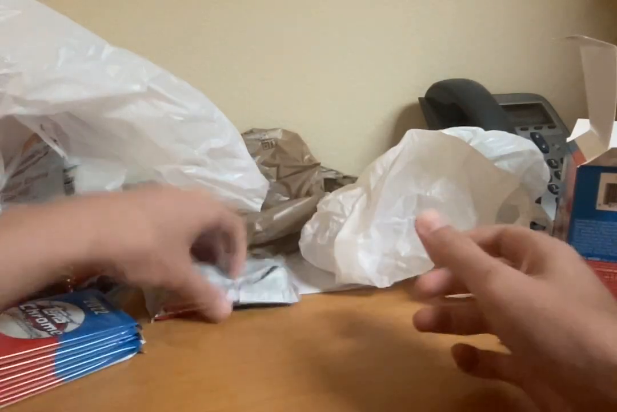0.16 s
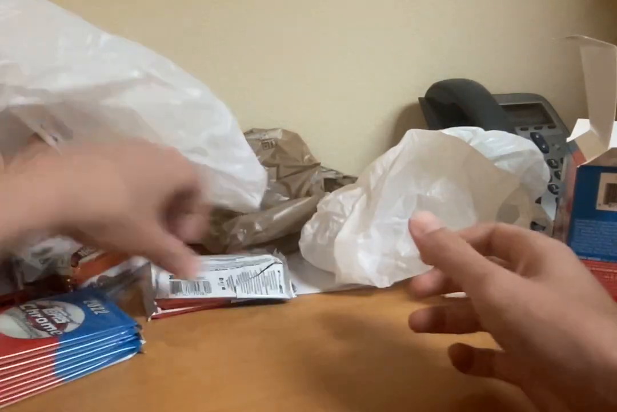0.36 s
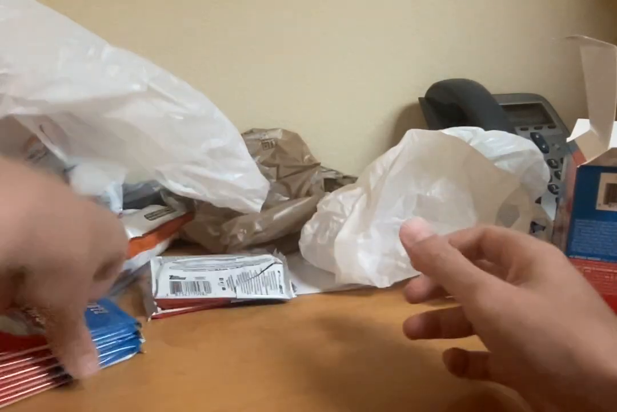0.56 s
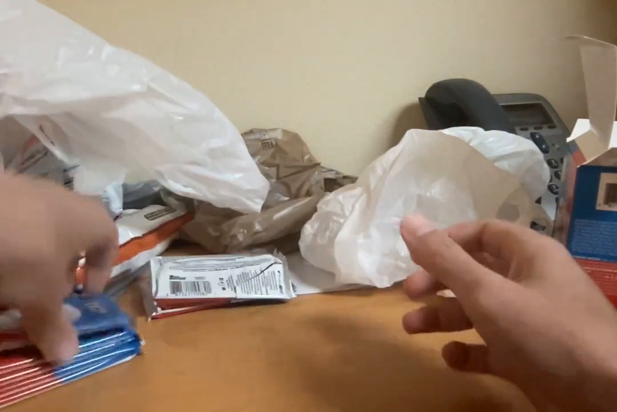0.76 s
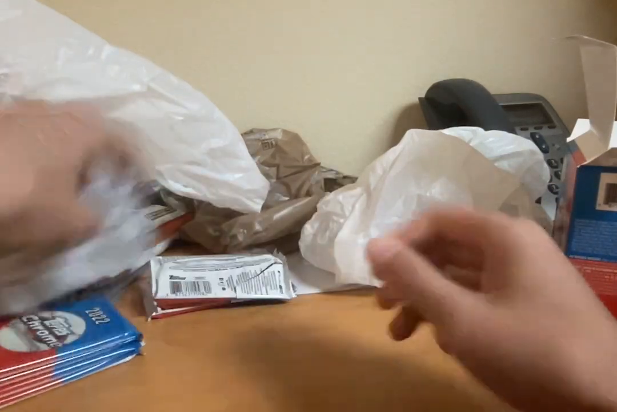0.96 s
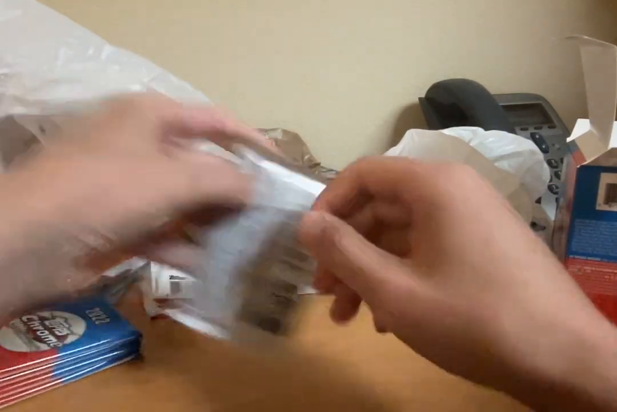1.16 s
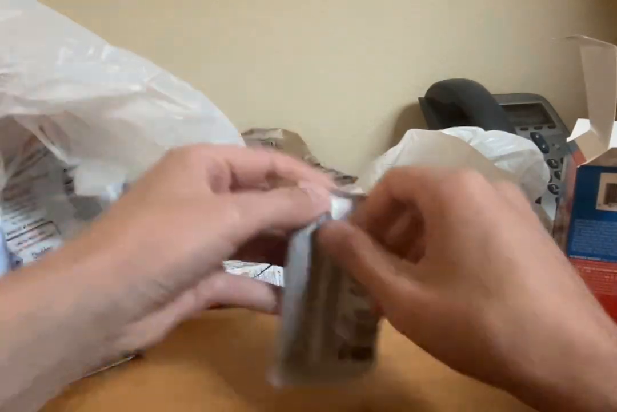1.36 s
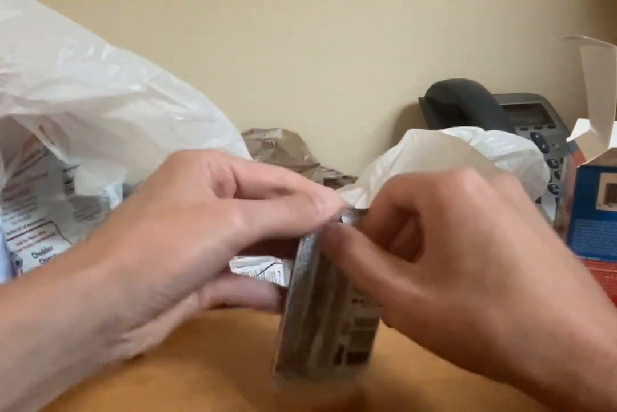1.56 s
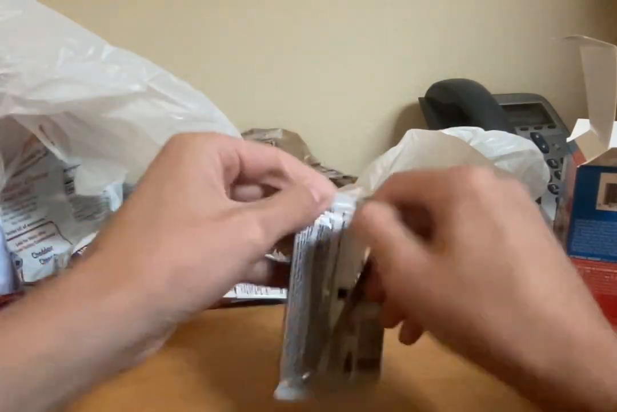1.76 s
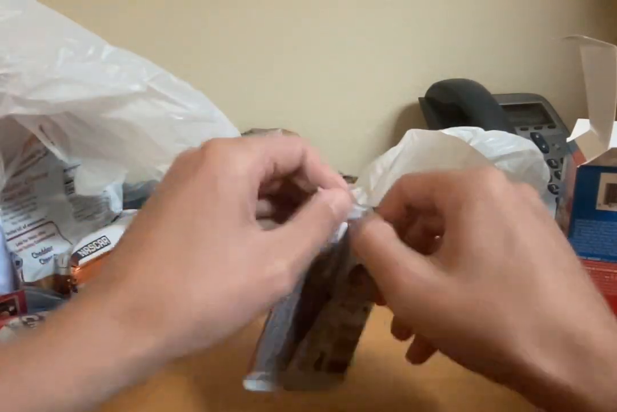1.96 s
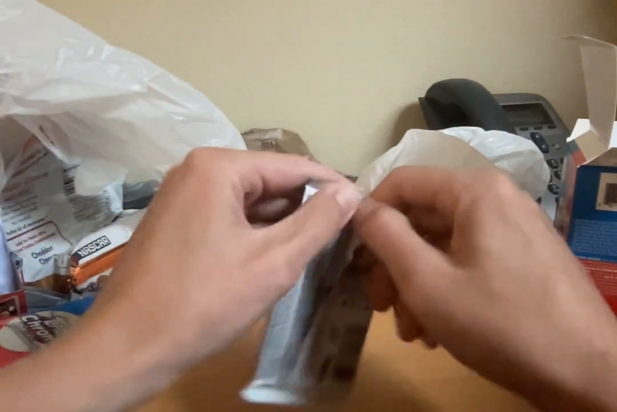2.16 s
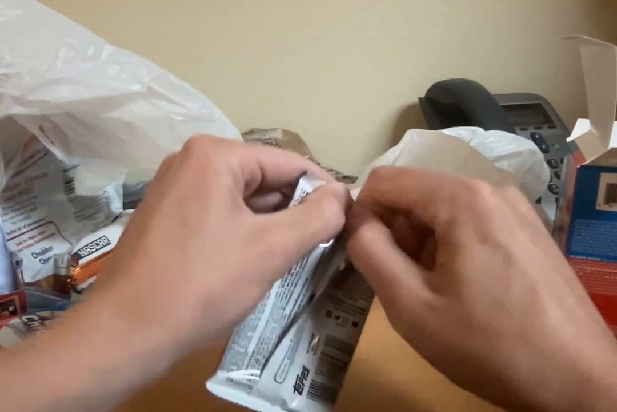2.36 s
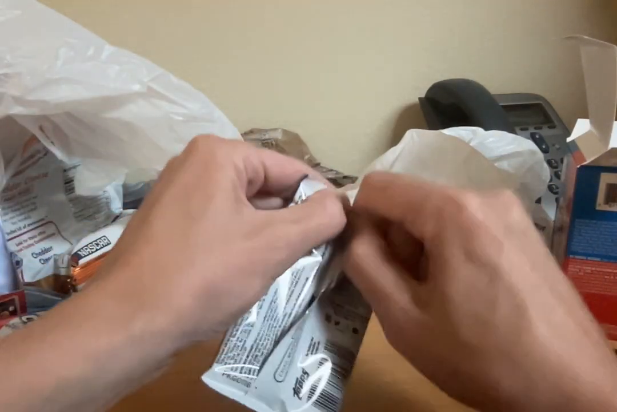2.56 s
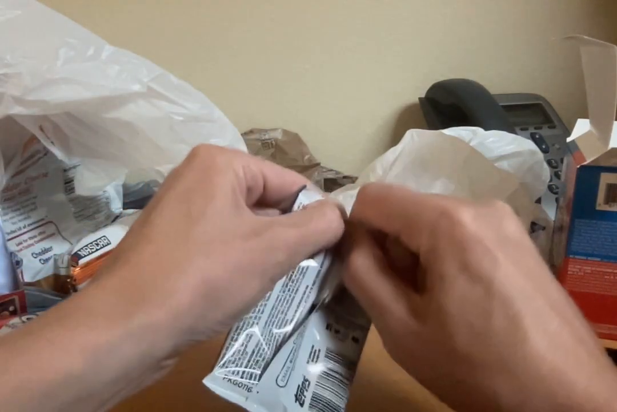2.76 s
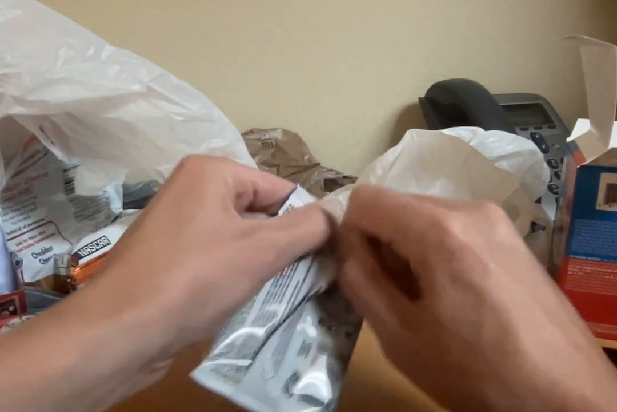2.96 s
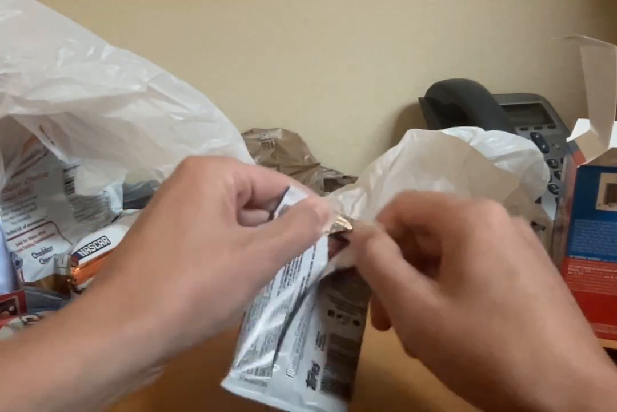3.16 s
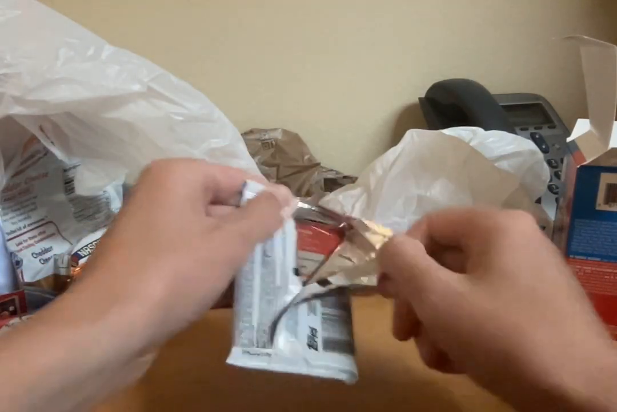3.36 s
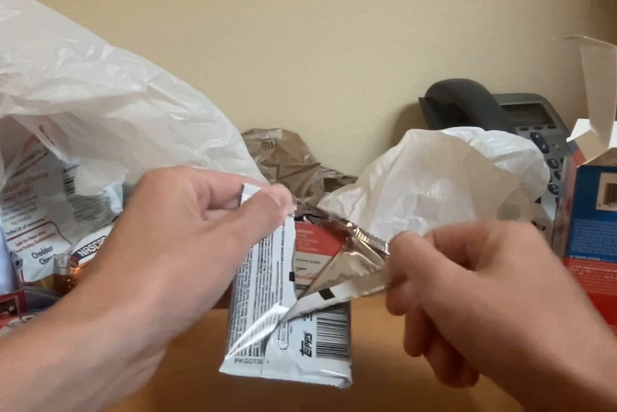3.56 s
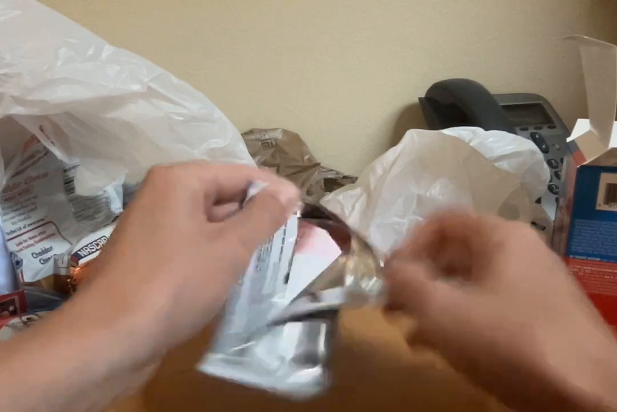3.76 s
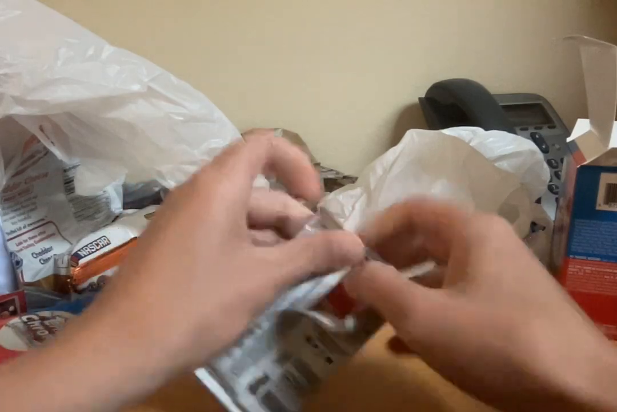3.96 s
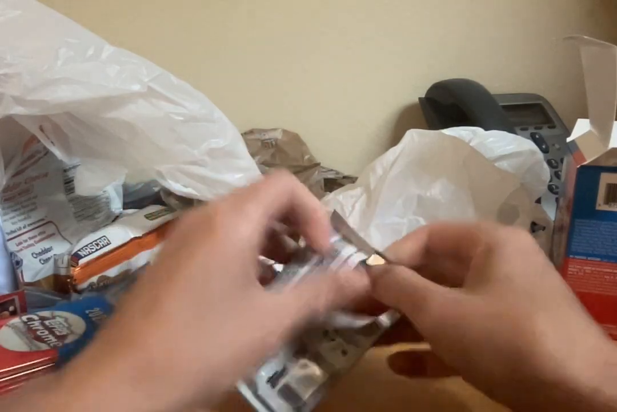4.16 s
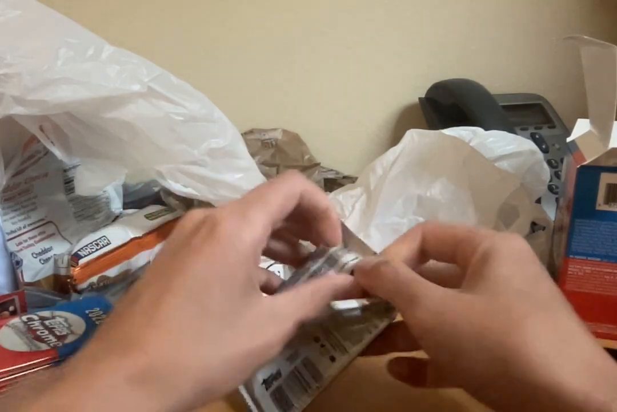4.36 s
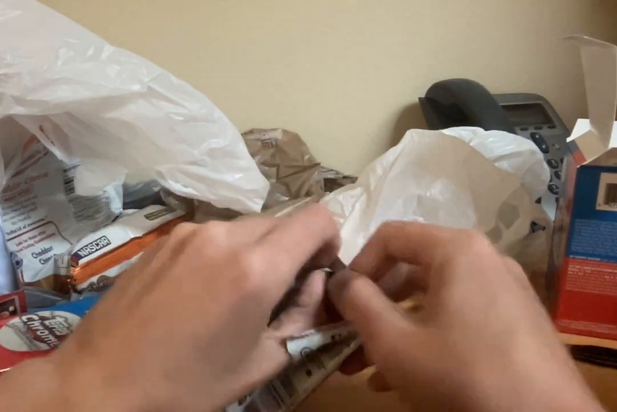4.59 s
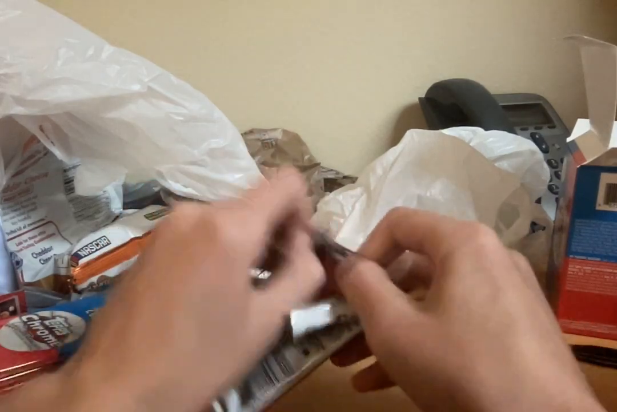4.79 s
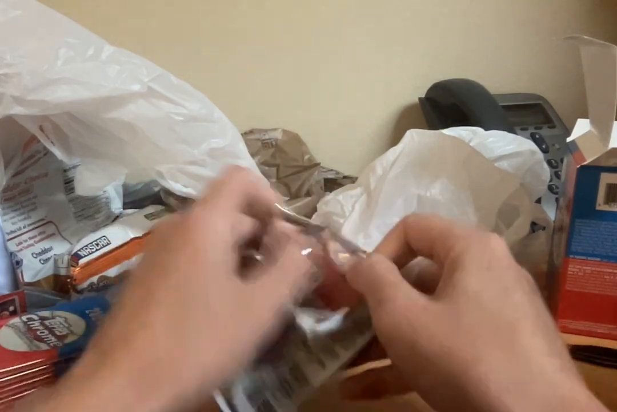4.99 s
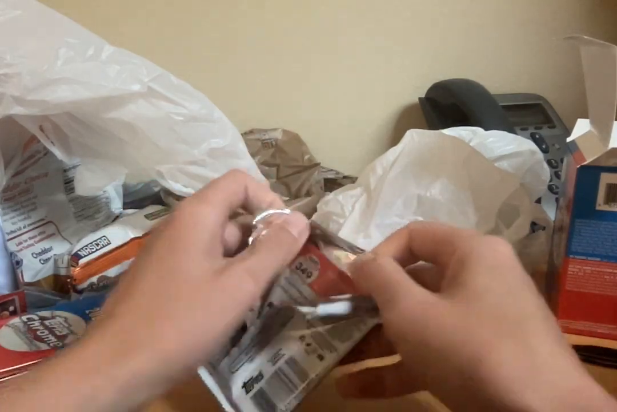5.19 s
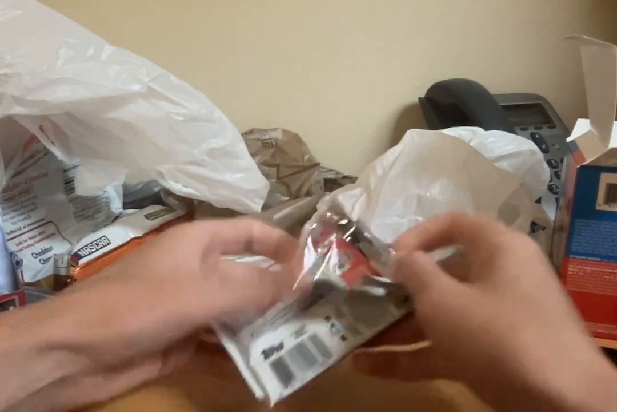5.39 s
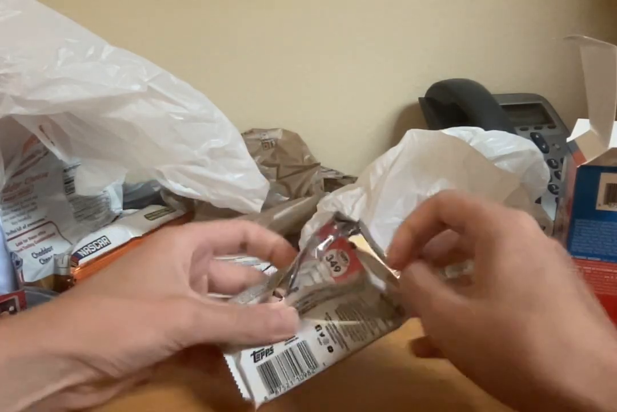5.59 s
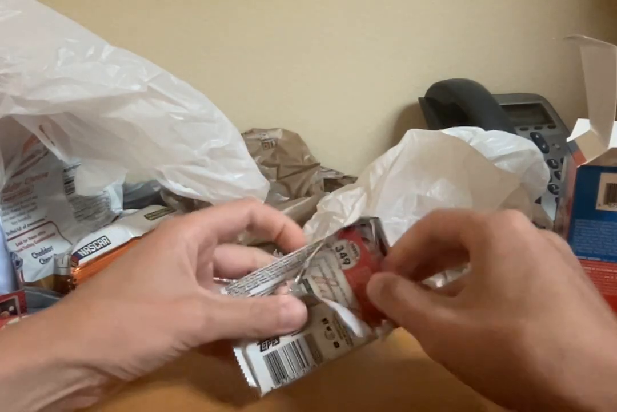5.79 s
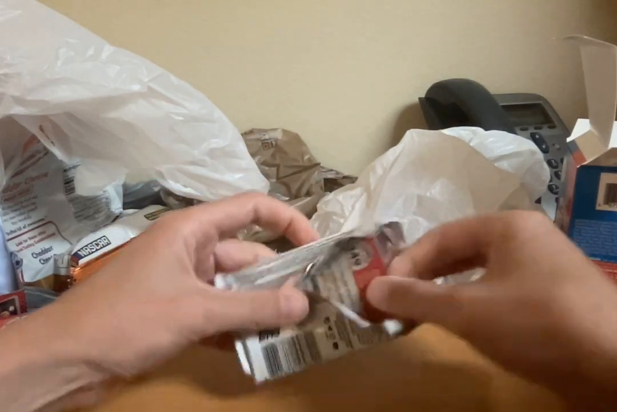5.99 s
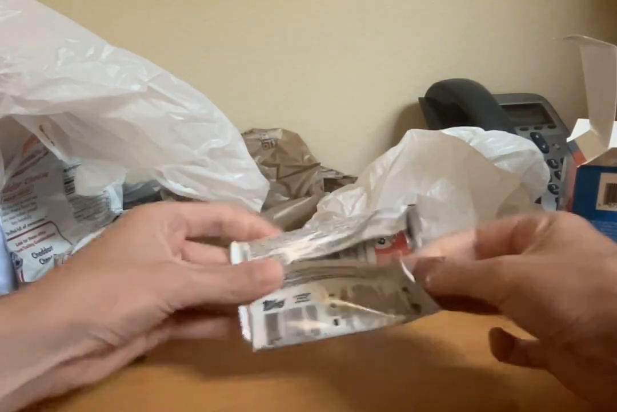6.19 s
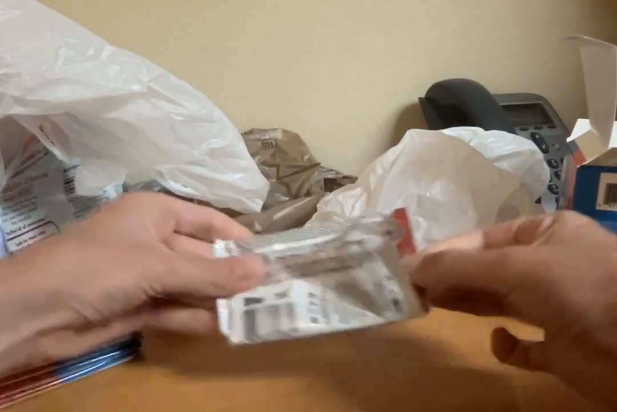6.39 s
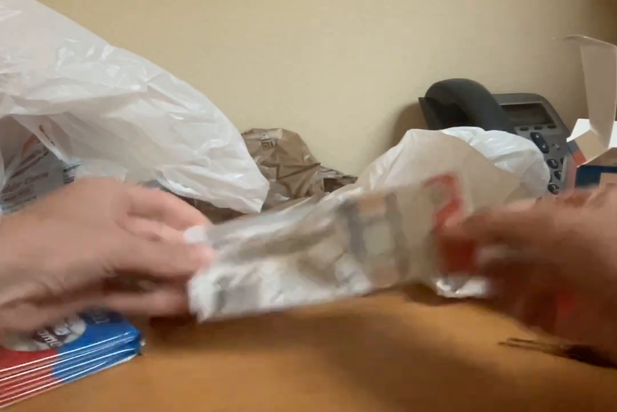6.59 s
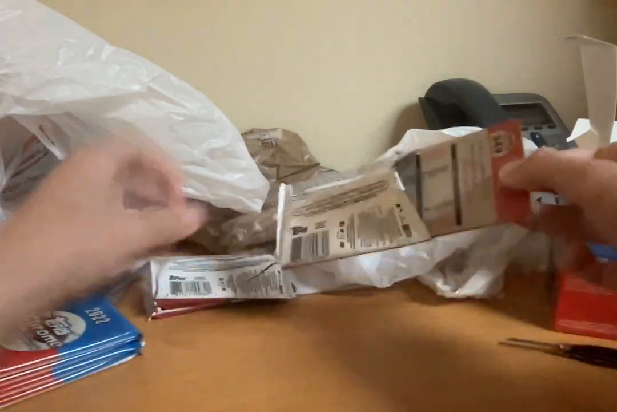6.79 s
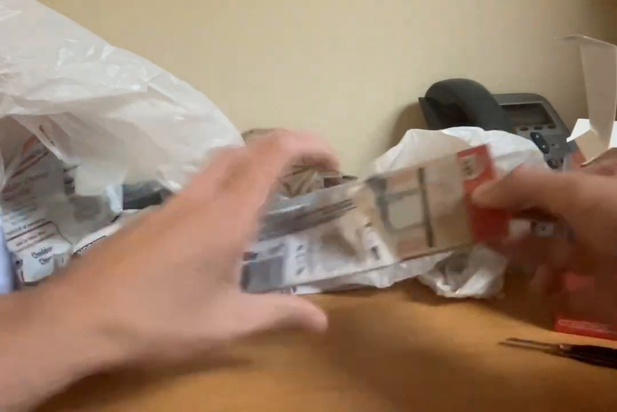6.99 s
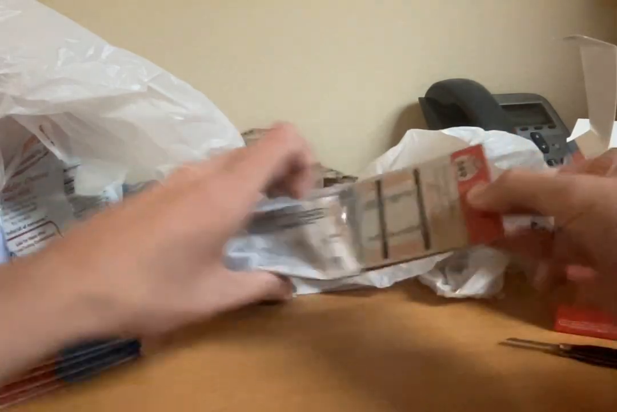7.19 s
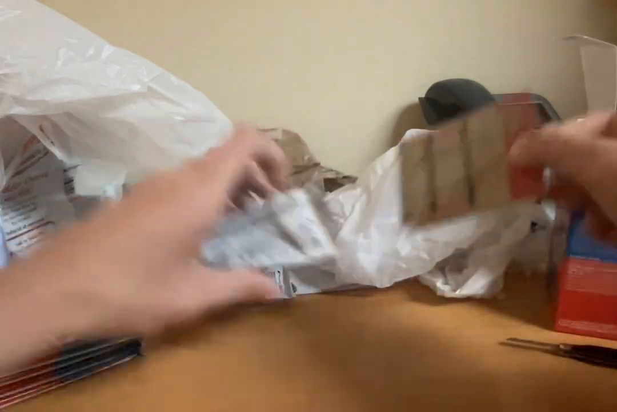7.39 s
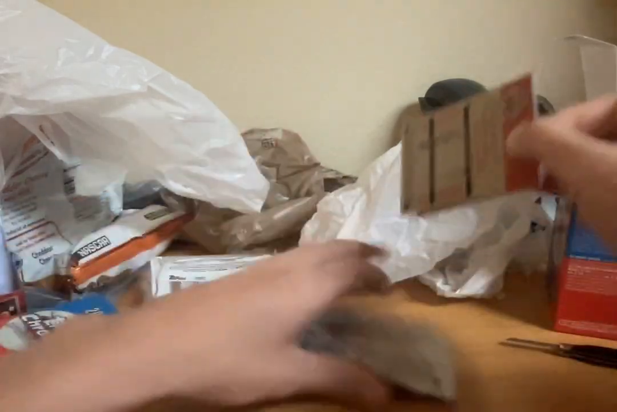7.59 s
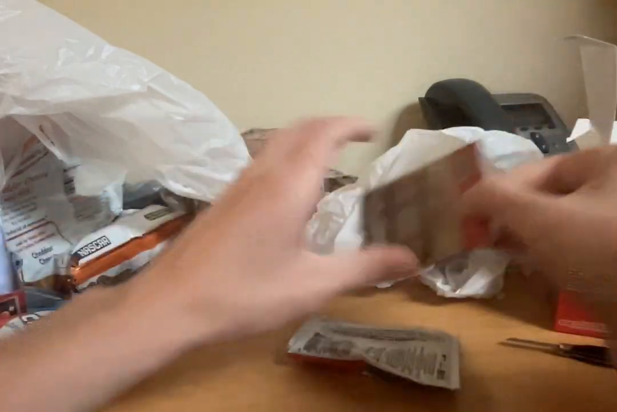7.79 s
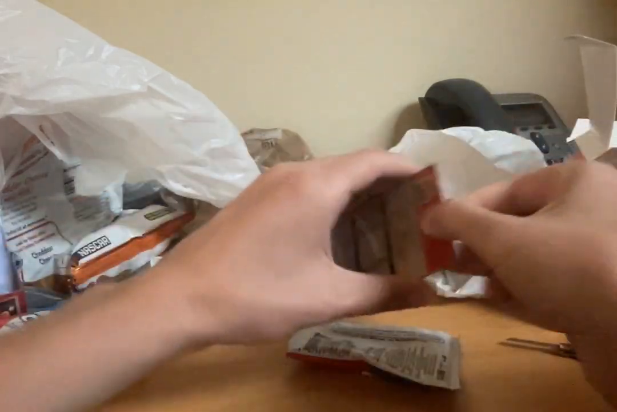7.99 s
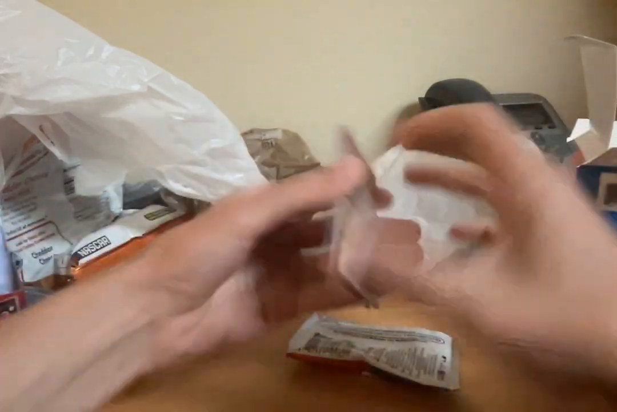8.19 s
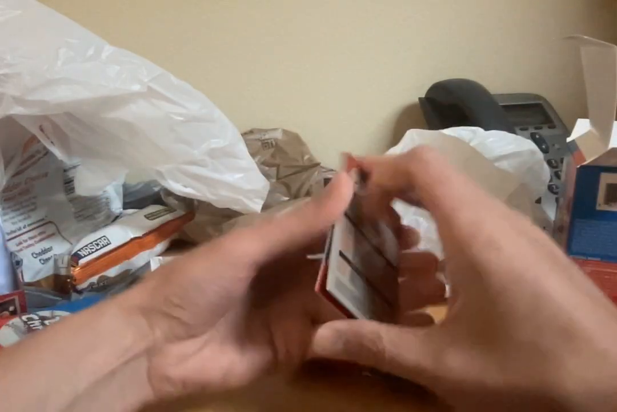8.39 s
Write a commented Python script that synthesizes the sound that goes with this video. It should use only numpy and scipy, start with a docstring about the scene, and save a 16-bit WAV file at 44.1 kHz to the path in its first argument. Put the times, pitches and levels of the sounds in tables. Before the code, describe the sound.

A quiet, low fan hum with soft airy noise runs steadily throughout a small room. Close by, light foil ticks sound at 0.2-0.35 seconds, then a pause, and a few more creases from 0.8 to 1.3. At 1.4 the foil starts snapping sharply, with a strong cluster at 1.7-1.8 and another near 2.5. From 2.85 to 3.4 the seam tears in dense bright crackle and short rips, capped by a very loud snap at 3.58. Softer crinkles follow, thickening after 4.2 into a heavy crunchy burst at 4.8-5.0. Scattered pops continue, with firm snaps at 5.9 and 6.0. Between 6.0 and 6.7 smoother sliding rustle mixes with crackles and a snap with a faint hollow knock. Small scuffs and ticks occur at 7.1-7.3, a modest snap at 7.66, then almost only the fan until about 8.4, with a barely audible tick.

```python
"""A fan hums steadily and held foil rustles faintly; then two hands pick up a foil pack of cards.
They pinch and tear its seam, slide the cards out and drop the wrapper on a desk.
Creases snap as sharp pulses with a ringing facet, over a rustle of random clicks and smooth hiss.
Rips are short runs of breaks, knocks are fading tones, and the fan is shaped noise plus tones.
Echoes and a short tail of fading noise make the small room around the foil and the pack."""
import sys
import numpy as np
from scipy import signal
from scipy.fft import rfft, irfft
from scipy.io import wavfile

SR = 44100
rng = np.random.default_rng(int(sys.argv[2]) if len(sys.argv) > 2 else 0)


def dump(signal):
    """Clip the signal to [-1, 1] and save it as 16-bit WAV at the path in sys.argv[1]."""
    limited = np.clip(np.atleast_2d(signal).T, -1, 1)
    pcm = np.round(limited * 32767).astype(np.int16)
    wavfile.write(sys.argv[1], SR, pcm)


N = 372644
TIME = np.arange(N) / SR   # seconds

# shape of the fan's moving air: (frequency [Hz], relative level [dB])
AIR_SHAPE = [(20, 1), (36, -19.5), (50, -1.5), (85, -10.5), (150, 1.5), (220, -6.5), (320, -3.5), (370, -9),
             (590, -8.5), (720, -16), (1800, -23), (3000, -33.5), (8000, -48.5), (16000, -63)]
# room resonances stirred by the fan: (frequency [Hz], width, doubled in each of two passes [Hz], level [dB])
FAN_DRONE = [(27.46, 1.7, -65.5), (137.7, 21.4, -52.5), (285.4, 23, -54.5), (1750, 47, -70.5)]
# steady tones of the fan: (frequency [Hz], level around which it wavers [dB])
FAN_TONES = [(120, -65.5), (258.1, -57), (395, -69)]
# strokes of the fingers, from picking up the pack to squaring the cards:
# (start [s], length [s], level halfway [dB], swell from start to end [dB], brightness [dB])
FINGER_STROKES = [ (0.184, 0.05, -52, 7.5, -4), (0.294, 0.09, -61, -4.5, -5.5),
                  (0.854, 0.078, -57, -4, -9.5), (1.169, 0.15, -62.5, 13, -2), (1.394, 0.02, -47, 0.5, 7),
                  (1.546, 0.15, -55, 1.5, 0), (1.728, 0.018, -39, 1, 3), (1.77, 0.046, -50, 2, 2),
                  (1.833, 0.014, -53, -7, -14), (1.93, 0.17, -55, -15, -1), (2.144, 0.3, -62, -6, -4),
                  (2.456, 0.11, -55.5, 0.5, -3), (2.572, 0.097, -60.5, 4, 2), (2.907, 0.019, -39, -2, 2),
                  (2.929, 0.35, -57, -3, -2), (3.191, 0.17, -44, 13.5, -2.5), (3.377, 0.11, -45.5, -8, -2),
                  (3.584, 0.04, -52, -13, 6), (3.77, 0.088, -56.5, 3, -2), (3.891, 0.1, -55.5, -6.5, -5.5),
                  (4.12, 0.023, -55.5, 3, -2), (4.214, 0.17, -57, 2, -0.5), (4.442, 0.1, -50, 2.5, -4.5),
                  (4.582, 0.054, -56.5, -3, -5), (4.639, 0.042, -48.5, 2, 1), (4.69, 0.13, -56.5, 3, -6),
                  (4.806, 0.08, -40, 7.5, -2), (4.9, 0.046, -43.5, 2.5, -12), (4.963, 0.24, -50.5, -1, -5),
                  (5.225, 0.091, -59.5, -4.5, -7), (5.387, 0.17, -56, 1.5, -5),
                  (5.629, 0.084, -58, -6.5, 4), (5.89, 0.048, -56.5, 1.5, -5), (6.009, .37, -55, 0.5, -2),
                  (6.41, 0.28, -51, 3, 0.5), (7.089, 0.13, -60.5, 9.5, -3), (7.201, 0.026, -50, -2.5, 2),
                  (7.255, 0.031, -46.5, 2.5, 0.5), (7.313, .015, -52.5, -1, -4),
                  (7.594, 0.0091, -53, 6, -4), (7.667, 0.028, -62, -7.5, -10),
                  (8.172, 0.016, -72.5, 1, 3.5)]
# how much the foil slides instead of crumpling: (time [s], share of smooth friction [0 to 1])
SLIDING_SHARE = [(0, .6), (1.1, .6), (1.4, .2), (3.35, .12), (3.65, .4), (4.5, .4), (4.85, .15), (5.9, .3),
                 (6.2, .55), (6.75, .65), (7.2, .45)]
# the foil's three bands, large facets to small: (low edge [Hz], high edge [Hz], 60 dB fade of a snap [s])
FOIL_BANDS = [(1190, 2403, 0.037), (2370, 8680, 0.023), (6600, 18900, 0.015)]
# pitches of the small stray creases: (lowest [Hz], highest [Hz])
TICK_PITCH_RANGE = (1600, 6500)
# single creases buckling, loud and soft:
# (time [s], level [dB], pitch of the flipping facet [Hz], top band relative to the level [dB])
CREASES = [(0.2147, -32, 2400, -6), (0.2217, -28, 2000, -11), (0.2365, -28, 1400, -7),
           (0.3538, -33.5, 3950, 2), (0.796, -39.5, 7700, -2), (0.8481, -29, 2610, -24.5),
           (0.8631, -33, 2160, -8), (0.9362, -31.5, 1970, -10.5), (1.0607, -29.5, 2430, -26.0),
           (1.0945, -30, 1410, -1), (1.2428, -32.5, 5100, -10), (1.274, -26.5, 2450, -15),
           (1.3416, -34, 3200, 1), (1.3673, -22.5, 2320, -32.0), (1.3966, -16.0, 2300, -14),
           (1.4146, -27.0, 3200, -25), (1.4231, -22, 5200, -4), (1.4263, -23.5, 4400, -19),
           (1.4326, -26, 1750, -8.5), (1.4707, -30.0, 4200, -32.0), (1.5475, -27.5, 1650, -11),
           (1.5827, -24.5, 2740, -18.5), (1.593, -29.0, 1860, -19), (1.6634, -30.5, 2400, -13),
           (1.7006, -18, 2010, -9), (1.7195, -13, 3000, -13), (1.7314, -34, 2870, -23.0),
           (1.7398, -11, 3190, -8.0), (1.7471, -12.5, 2060, -9), (1.7692, -22, 2700, -2.0),
           (1.789, -26, 3000, 5), (1.7937, -12, 4440, -4.5), (1.81, -23, 3000, -26.0),
           (1.8264, -18.5, 7650, -17.0), (1.9408, -21.5, 2430, -6.5), (1.9924, -21, 2380, -1.5),
           (2.069, -26, 2150, -26), (2.1528, -30, 2700, -2.0), (2.1893, -28.5, 2400, -26.0),
           (2.1925, -26, 7940, -27.5), (2.2313, -23, 3000, -26), (2.2479, -28, 2400, -7),
           (2.2973, -24.5, 2300, -6.5), (2.3215, -27.0, 6850, -20.0), (2.3979, -18.5, 2900, -7.5),
           (2.4498, -18.5, 1550, -3), (2.4613, -27, 1560, -20), (2.4878, -11, 2150, -25),
           (2.4906, -12, 2860, -23), (2.5016, -20.5, 2870, -21), (2.5387, -26.5, 2570, -20),
           (2.5532, -28.5, 1960, -29.0), (2.558, -23, 2040, -26.0), (2.5665, -28, 1950, -29.0),
           (2.6172, -20.5, 1400, -41), (2.6552, -28, 1750, -30.5), (2.678, -45, 2150, 4),
           (2.704, -33, 1390, 0.5), (2.7495, -22, 7900, -8), (2.824, -38.5, 3900, -24.5),
           (2.8653, -13.5, 2280, -29), (2.8974, -20, 1930, -7), (2.9071, -16.5, 8440, 1.5),
           (2.9598, -23.5, 1750, -23.0), (2.9797, -22.5, 9030, -2), (3.0021, -14.5, 3220, -20),
           (3.0493, -20, 2030, 3), (3.0975, -16.5, 3750, -6.5), (3.1387, -21.0, 6500, -6.5),
           (3.1915, -26.5, 2870, -13), (3.2233, -26, 3340, -21.5), (3.2287, -29, 2300, -24),
           (3.258, -26, 3000, -9), (3.2625, -24, 3350, -24.5), (3.2779, -23.5, 1850, -1),
           (3.2868, -26, 2300, -1), (3.3057, -13.5, 6450, -8.5), (3.3491, -16.5, 3000, -8),
           (3.3545, -14.5, 7540, -8), (3.3717, -23, 8530, -13), (3.3827, -12.5, 7300, -8),
           (3.4711, -27, 3200, -9), (3.4797, -22.5, 8120, -21.5), (3.4851, -26, 2140, -8),
           (3.54, -28.5, 2550, -3), (3.5758, -5, 3460, -5.5), (3.7322, -34, 3500, -6),
           (3.7405, -32, 6500, -16), (3.7695, -28.5, 1500, -4.5), (3.7922, -30.5, 5900, -24.5),
           (3.9082, -32, 4000, -2.5), (3.9232, -25, 1390, -32.0), (3.972, -16.5, 8050, -17.5),
           (4.0102, -29.5, 2550, -3.5), (4.0258, -33, 8050, -11), (4.0725, -20.5, 3000, -16),
           (4.0908, -24.0, 1650, -22), (4.1271, -28, 2740, -9), (4.2583, -20.5, 4470, -36),
           (4.298, -20.0, 1410, -17), (4.3087, -26, 1550, -18.5), (4.3412, -20.5, 2150, -10),
           (4.355, -22.5, 2300, -9), (4.4261, -16.5, 2400, -17), (4.4424, -19, 2550, -3),
           (4.4657, -21, 3000, -11), (4.4791, -25.5, 2900, -23.0), (4.4971, -26.0, 2050, -24),
           (4.5494, -17, 3780, -11), (4.5524, -30, 3370, 3), (4.748, -28, 7650, -20.0),
           (4.7548, -18.5, 5730, -11), (4.8055, -21.5, 9520, -21.5), (4.8201, -17, 3140, -21),
           (4.832, -20, 4400, -10), (4.897, -6.5, 1656, -19), (4.9145, -18, 4360, -18.5),
           (4.9275, -15.5, 2550, -20.0), (4.9337, -17, 2070, -6), (4.9372, -12.5, 1550, -22),
           (4.9455, -13, 2730, -22), (4.9498, -9, 1956, -20), (5.0368, -27, 3950, -32.0),
           (5.075, -29, 2800, -24.5), (5.1144, -12.5, 7250, -14), (5.1578, -25, 6820, -9),
           (5.1848, -25, 1955, -7.5), (5.268, -31, 2150, -27), (5.524, -22.5, 2050, -14),
           (5.6371, -25.5, 2850, -9.5), (5.6622, -18.5, 2480, -12), (5.8184, -25.5, 2290, -8.0),
           (5.8689, -26.0, 2390, -10), (5.8935, -13.5, 3070, -10), (5.9244, -24, 1710, -18.5),
           (5.9339, -25, 8400, -26.0), (5.9495, -24.5, 2350, -25), (6.0301, -14, 1560, -8),
           (6.2671, -26, 5500, -14.0), (6.2755, -14, 6050, -18.5), (6.2791, -17, 2050, -4.5),
           (6.3463, -33.5, 2850, 3), (6.4088, -23, 8900, -3.5), (6.4334, -28, 2860, -26.0),
           (6.5678, -31.5, 3720, -9), (6.577, -30, 6400, -2), (6.6916, -12, 3610, -5),
           (7.1211, -26, 2086, -1.5), (7.1861, -31.5, 2800, -5.0), (7.2011, -24, 1710, -8),
           (7.2817, -23.5, 1400, -13), (7.417, -33, 2520, -15), (7.425, -37.5, 5020, -16),
           (7.6587, -20.5, 3350, -15), (7.852, -31, 2840, -10), (8.3615, -42.5, 1980, -16.5)]
# short rips and scuffs of foil:
# (start [s], length [s], level [dB], brightness, added to the treble and taken from the lows [dB])
FOIL_RIPS = [(2.861, 0.056, -34, 5.5), (3.284, 0.1, -43, 4), (3.841, 0.023, -38.5, 0),
             (4.159, 0.0054, -32.5, -2), (4.602, 0.0092, -42, 2.5), (4.85, 0.061, -41, -3),
             (6.664, 0.0076, -30.5, 1), (7.278, 0.011, -38.5, 0)]
# the whole pack knocked or flexed: (time [s], level [dB])
PACK_KNOCKS = [(3.353, -44), (4.162, -40.5), (5.0375, -42.5), (6.0301, -43), (6.6933, -42.5), (7.202, -45),
               (7.2813, -43.5)]
# ringing modes of the pack: (frequency [Hz], relative level before chance [dB], 60 dB fade [s])
PACK_MODES = [(478, -1, 0.047), (583, 1.5, 0.069), (840, 0, 0.043), (1200, 4.5, 0.017)]
# resonances of the wrapper's stiff panels: (frequency [Hz], width [Hz], level [dB])
WRAPPER_PANELS = [(1560, 220, -6.5), (1930, 170, -12), (3200, 650, -10.5), (5800, 2500, -12)]

AIR_DB = -48
ATTACK_S, RELEASE_S = .008, .018   # time constants of a stroke
HOLDING_DB, HELD_UNTIL_S = -71.5, 6.75   # faint rustle of the pack merely being held
# low and top band of the rustle relative to its middle; brightness tips them against each other
BODY_DB, SHEEN_DB = -6.5, -3.5
# small creases under an average grip: rustle level of that grip, flips per second, flip level, scatter
GRIP_DB, TICKS_PER_S, TICK_DB, TICK_SPREAD_DB = -52, 34, -35, 3
TICK_CEILING_DB = -25   # a small crease can store only so much; the scatter comes on top
# a harder grip flips them more often and more loudly (dB per dB of rustle)
TICK_RATE_FOLLOWS, TICK_LEVEL_FOLLOWS = .65, .8
SNAP_LOW_DB, SNAP_MID_DB = -22, -12.5   # low and middle band relative to the snap's level
FACET_DB, FACET_Q = -11, 3.8   # facet's ring: level relative to the snap's, pitch over width
ROOM_TAIL_DB, ROOM_T60_S = -18, .25
CUTOFF_HZ = 15800


def from_db(db):
    """Turn decibels into gain."""
    return 10 ** (np.asarray(db) / 20)


def rms_one(x):
    """Scale a sound to an average strength (rms) of 1."""
    return x / np.sqrt(np.mean(x ** 2) + 1e-20)


def in_time(rows):
    """Draw each column of a curve at every sample."""
    s, *columns = np.transpose(rows)
    return [np.interp(TIME, s, c) for c in columns]


def band_filter(low_hz, high_hz):
    """Design a filter that passes one band of pitches."""
    return signal.butter(2, [low_hz, min(high_hz, .45 * SR)], "band", fs=SR, output="sos")


def band(x, low_hz, high_hz):
    """Keep one band of pitches."""
    return signal.sosfilt(band_filter(low_hz, high_hz), x + 1e-18)


def resonance(x, hz, width_hz):
    """Ring at one pitch, with gain 1 at the top; a narrower width rings longer."""
    r = np.exp(-np.pi * width_hz / SR)
    feed = np.array([1, 0, -1]) * (1 - r * r) / 2
    feedback = [1, -2 * r * np.cos(2 * np.pi * hz / SR), r * r]
    return signal.lfilter(feed, feedback, x + 1e-18)


def drift(rate):
    """Wander by chance with rms 1, heading for a new random value `rate` times a second."""
    knots = rng.standard_normal(N // 10)
    return rms_one(np.interp(TIME * rate, np.arange(len(knots)), knots))


def fan(waver_db=1.5):
    """Moving air, the room resonances that it stirs, and a few slightly wavering tones."""
    hz, db = np.transpose(AIR_SHAPE)
    bins_hz = np.maximum(np.fft.rfftfreq(N, 1 / SR), 1)
    shape = from_db(np.interp(np.log(bins_hz), np.log(hz), db))
    air = rms_one(irfft(rfft(rng.standard_normal(N)) * shape, N))
    drone = 0
    for hz, width_hz, db in FAN_DRONE:
        stirred = resonance(rng.standard_normal(N + SR), hz, 2 * width_hz)
        settled = resonance(stirred, hz, 2 * width_hz)[SR:]   # skip the second in which it builds up
        drone = drone + from_db(db) * rms_one(settled)
    tones = 0
    for hz, db in FAN_TONES:
        level = from_db(db + waver_db * drift(2.9))
        tones = tones + level * np.sqrt(2) * np.sin(2 * np.pi * (hz * TIME + rng.random()))
    return from_db(AIR_DB) * air + drone + tones


def handling():
    """Level and brightness of the fingers' work: each stroke sets in, swells or eases, and lets go."""
    power = from_db(HOLDING_DB) ** 2 * (TIME < HELD_UNTIL_S) + 1e-12
    tipped = 0
    for start, length, level_db, swell_db, bright_db in FINGER_STROKES:
        progress = np.clip((TIME - start) / length, 0, 1)
        # time before or after the stroke, in time constants
        outside = np.maximum((start - TIME) / ATTACK_S, (TIME - start - length) / RELEASE_S)
        fade = np.exp(-np.clip(outside, 0, 20))
        stroke = (fade * from_db(level_db + swell_db * (progress - .5))) ** 2
        power = power + stroke
        tipped = tipped + stroke * bright_db
    return 10 * np.log10(power), tipped / power   # louder strokes weigh more in the brightness


def grains(per_s, range_db):
    """Random clicks, sizes spread evenly in dB; their power does not depend on their rate."""
    sizes = from_db(-range_db * rng.random(N)) * np.sign(rng.standard_normal(N))
    return sizes * (rng.random(N) < per_s / SR) / np.sqrt(per_s)


def facets(clicks, low_hz, high_hz, sliding=0, count=4):
    """Clicks and friction excite facets of several sizes; each swells and fades as the fingers shift."""
    edges = np.geomspace(low_hz, high_hz, count + 1)
    out = 0
    for low, high in zip(edges, edges[1:]):
        buckling = rms_one(band(clicks * rng.standard_normal(N), low, high))
        friction = rms_one(band(rng.standard_normal(N), low, high))
        contact = from_db(4 * drift(55))
        mixed = np.sqrt(sliding) * friction + np.sqrt(1 - sliding) * buckling
        out = out + np.sqrt(high - low) * contact * mixed
    return rms_one(out)


def rustle(level_db, bright_db, per_s=500):
    """Clumps of tiny buckles, denser under a harder grip, smoothing into hiss where surfaces slide."""
    sliding = in_time(SLIDING_SHARE)[0]
    grip_db = level_db - np.median(level_db)
    density = per_s * from_db(.5 * grip_db + 4.5 * drift(70))
    clicks = grains(density, range_db=26) * from_db(2 * drift(60))
    colours_db = (BODY_DB - bright_db, 0, SHEEN_DB + bright_db)
    out = 0
    for (low_hz, high_hz, _), colour_db in zip(FOIL_BANDS, colours_db):
        out = out + from_db(level_db + colour_db) * facets(clicks, low_hz, high_hz, sliding)
    return out


def stray_ticks(level_db, bright_db, sheen_db=-17):
    """Pick random flips of small creases while the foil is worked; rows like CREASES."""
    times = rng.uniform(0, TIME[-1], 2400)   # candidates, of which only some flip
    grip = np.interp(times, TIME, level_db - GRIP_DB)
    bright = np.interp(times, TIME, bright_db)
    flips_per_s = TICKS_PER_S * from_db(TICK_RATE_FOLLOWS * grip)
    flips = rng.random(len(times)) < flips_per_s * TIME[-1] / len(times)
    tick_db = np.minimum(TICK_DB + TICK_LEVEL_FOLLOWS * grip, TICK_CEILING_DB)
    facet_hz = np.exp(rng.uniform(*np.log(TICK_PITCH_RANGE), len(times)))
    scatter_db = rng.normal(0, TICK_SPREAD_DB, (2, len(times)))
    top_db = sheen_db + bright + scatter_db[1]
    return np.transpose([times, tick_db + scatter_db[0], facet_hz, top_db])[flips]


def snaps(creases, size=1200, crack_s=0.0012, slip_s=0.00045, slip_db=-4, rebound=0.91):
    """A crease creeps, flips with a sharp pulse and rebounds; its facet rings and waves scatter."""
    lead = size // 8   # samples of creeping before the flip
    out = np.zeros(N + 2 * size)
    t = (np.arange(size) - lead) / SR
    filters = [band_filter(low_hz, high_hz) for low_hz, high_hz, _ in FOIL_BANDS]
    for s, level_db, facet_hz, top_db in creases:
        rebound_at = lead + int(rng.uniform(.0002, .002) * SR)
        flutter = rng.uniform(.05, .12)
        bounce = rebound * rng.random()
        pushes = []
        for _, _, t60 in FOIL_BANDS:
            creep = from_db(slip_db) * np.exp(-np.abs(t) / slip_s)
            scatter = np.where(t < 0, creep, from_db(-60 * t / t60))
            push = flutter * scatter * rng.laplace(0, np.sqrt(.5), size)
            push[lead] += 1
            push[rebound_at] -= bounce
            pushes.append(push)
        parts = [signal.sosfilt(sos, push) for sos, push in zip(filters, pushes)]
        parts.append(resonance(pushes[1], facet_hz, facet_hz / FACET_Q))
        at = int(s * SR) + size - lead
        for part, colour_db in zip(parts, (SNAP_LOW_DB, SNAP_MID_DB, top_db, FACET_DB)):
            # equal energy for every part, as if it were rms 1 for the length of the crack
            even = part / np.sqrt(np.sum(part ** 2) / (crack_s * SR))
            out[at:at + size] += from_db(level_db + colour_db) * even
    return out[size:size + N]


def rips(low_hz=1150, split_hz=4500, high_hz=15000, release_s=.004):
    """The foil gives way at once in a fast run of tiny breaks, which then peters out."""
    out = 0
    for low, high, tip in ((low_hz, split_hz, -1), (split_hz, high_hz, 1)):
        pull = 0
        for s, length, db, bright_db in FOIL_RIPS:
            release = np.exp(-np.clip((TIME - s - length) / release_s, 0, 20))
            pull = pull + from_db(db + tip * bright_db) * (TIME > s) * release
        breaks = grains(3000, range_db=24)
        out = out + pull * facets(breaks, low, high, count=3) / np.sqrt(2)
    return out


def knocks(size=4000):
    """Each blow rings the pack's modes with strengths of its own."""
    out = np.zeros(N + size)
    t = np.arange(size) / SR
    for s, level_db in PACK_KNOCKS:
        at = int(s * SR)
        for hz, mode_db, t60 in PACK_MODES:
            strength_db = level_db + mode_db + rng.normal(0, 1.2)
            out[at:at + size] += from_db(strength_db - 60 * t / t60) * np.sin(2 * np.pi * hz * t)
    return out[:N]


def pouch(foil, hollow_hz=560, hollow_width_hz=420, hollow_db=7.0):
    """The hollow of the wrapper and its stiff panels colour all that the foil does."""
    hollow = resonance(foil, hollow_hz, hollow_width_hz)
    hollow = resonance(hollow, hollow_hz, hollow_width_hz)
    panels = sum(from_db(db) * resonance(foil, hz, width_hz) for hz, width_hz, db in WRAPPER_PANELS)
    return foil + from_db(hollow_db) * hollow + panels


def room(x, desk_s=.0021, desk_db=-23.5, wall_s=0.0096, wall_db=-24.0, treble_t60=0.17, size=20000):
    """Echoes off the desk and the wall, then a diffuse tail whose treble dies first."""
    t = np.arange(size) / SR
    low = band(rng.standard_normal(size), 300, 6400) * from_db(-60 * t / ROOM_T60_S)
    high = band(rng.standard_normal(size), 5800, 20000) * from_db(-60 * t / treble_t60)
    tail = rms_one((low + high) * (t > .004))
    response = from_db(ROOM_TAIL_DB) * tail / np.sqrt(size)
    response[0] += 1   # the direct sound
    response[int(desk_s * SR)] += from_db(desk_db)
    response[int(wall_s * SR)] += from_db(wall_db)
    return signal.fftconvolve(x, response)[:N]


def scene(snap_db=0.05, rustle_db=0.0):
    """Foil coloured by its pouch and knocks of the pack sound in the room; the fan is added to them."""
    level_db, bright_db = handling()
    creases = from_db(snap_db) * snaps(CREASES) + snaps(stray_ticks(level_db, bright_db))
    crackle = from_db(rustle_db) * rustle(level_db, bright_db)
    foil = pouch(creases + crackle + rips())
    return (room(foil + knocks()) + fan())[None]


def record(dry):
    """Cut the top steeply with a low-pass filter."""
    return signal.sosfilt(signal.ellip(10, .2, 80, CUTOFF_HZ, fs=SR, output="sos"), dry)


dry = scene()
out = record(dry)
dump(out)
```